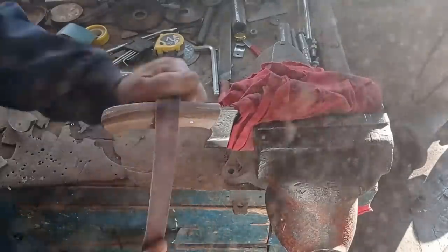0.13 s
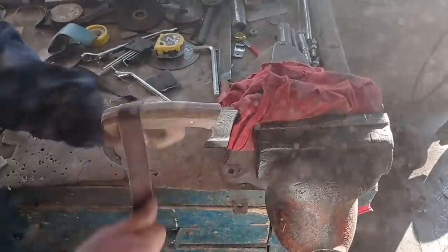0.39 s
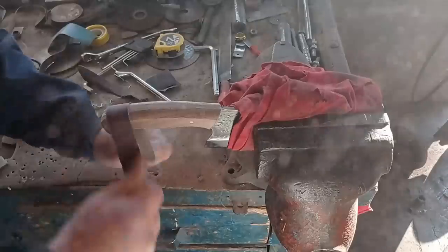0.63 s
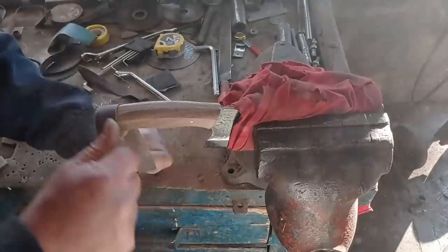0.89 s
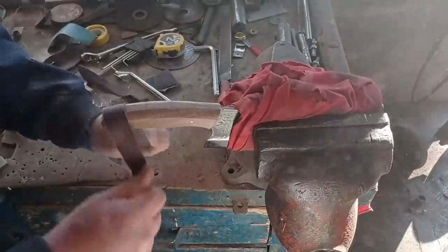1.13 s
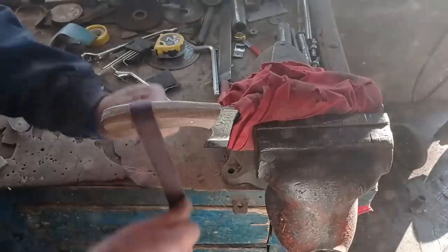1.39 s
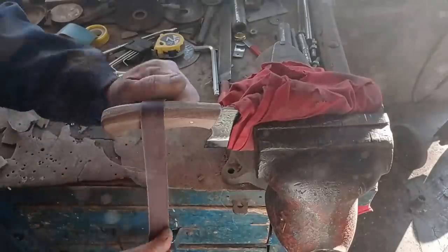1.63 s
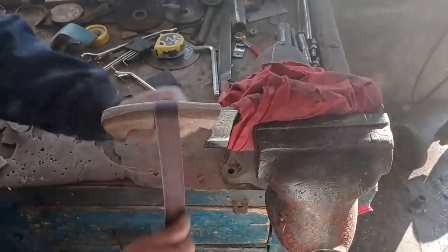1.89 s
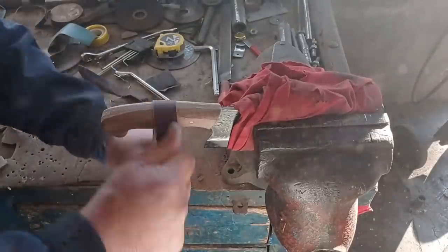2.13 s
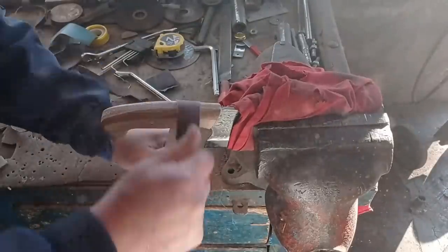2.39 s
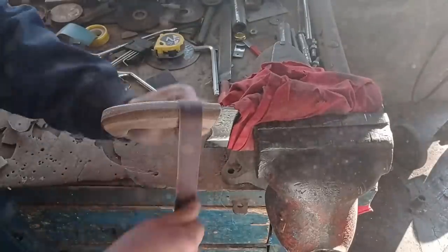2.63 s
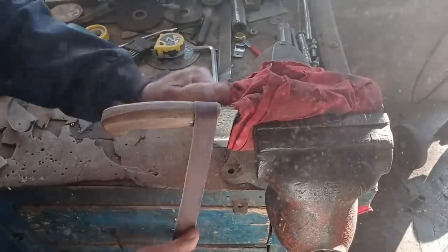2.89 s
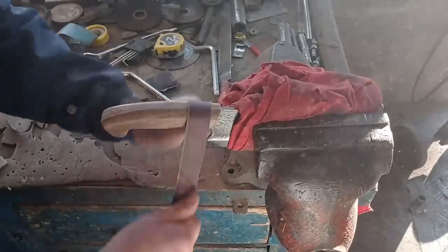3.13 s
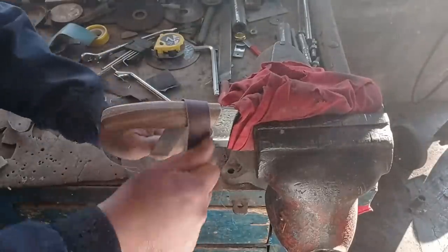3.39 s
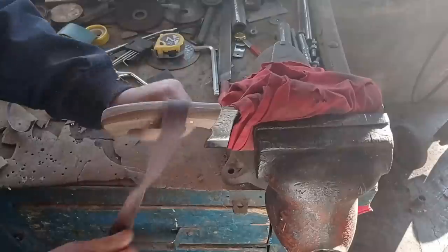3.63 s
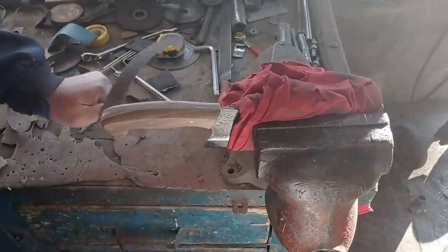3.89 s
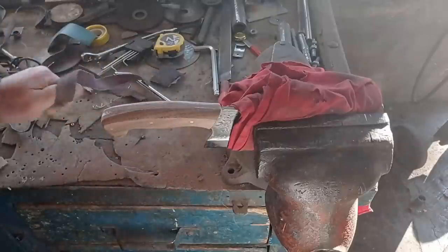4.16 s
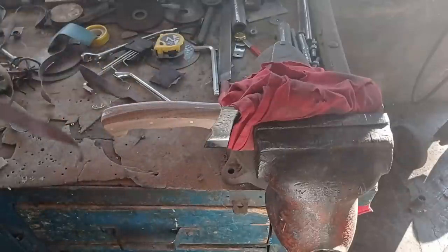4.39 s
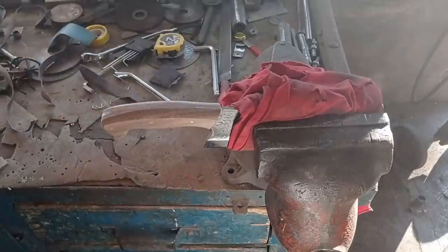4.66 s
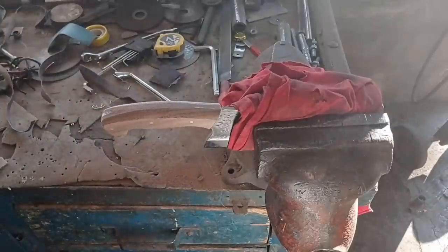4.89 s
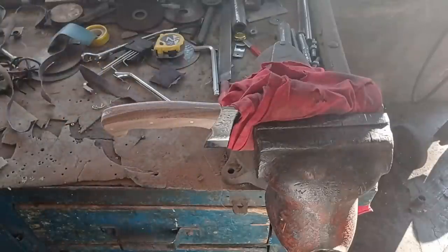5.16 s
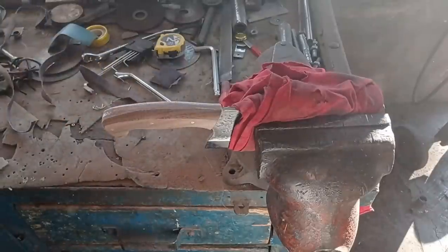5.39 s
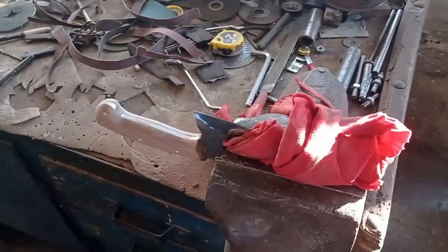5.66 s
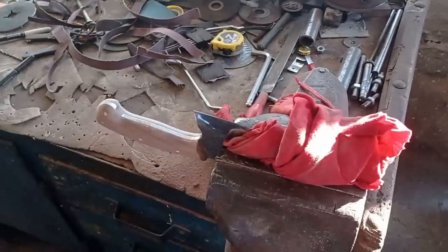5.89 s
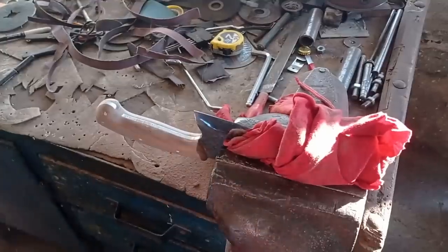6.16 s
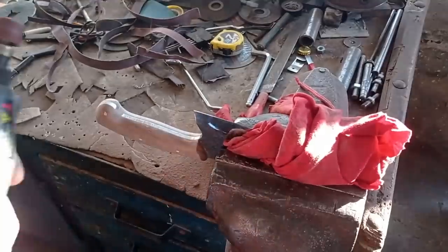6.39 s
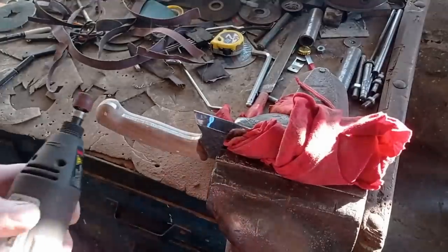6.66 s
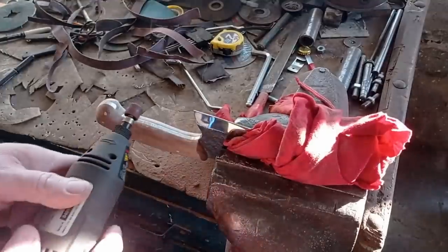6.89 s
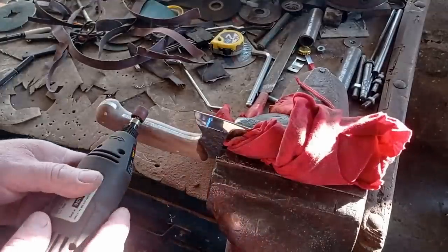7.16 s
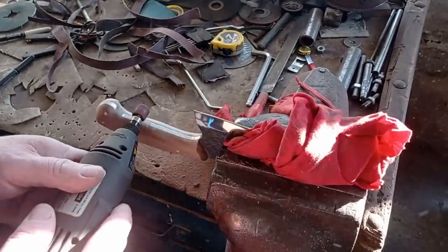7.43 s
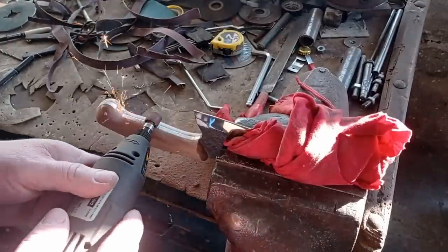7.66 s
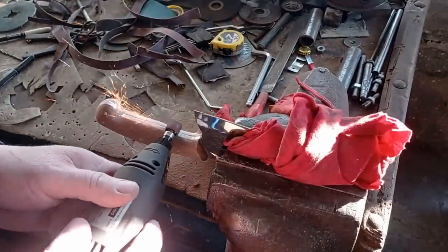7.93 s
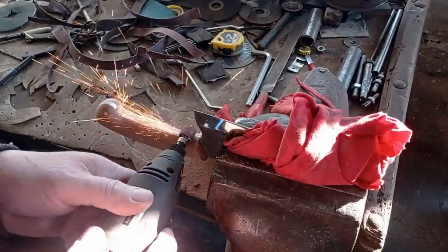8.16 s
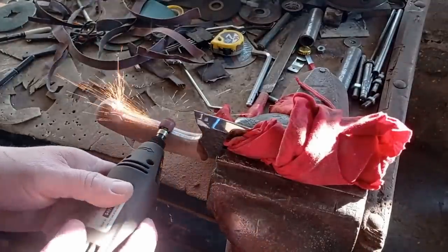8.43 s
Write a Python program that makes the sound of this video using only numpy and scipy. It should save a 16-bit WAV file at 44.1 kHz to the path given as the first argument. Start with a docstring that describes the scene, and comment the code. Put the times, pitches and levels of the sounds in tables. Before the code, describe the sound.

Fast dry sanding strokes in a workshop, a soft cloth drop and near silence, then an abrupt high motor whine that bogs down grinding metal.

```python
"""A small rotary tool enters at full speed: shaft orders and noise rush, then a drum grinding steel as it slows.
Its cooling air buffets the microphone as swelling low noise. Before it, a strip of abrasive cloth is
pulled to and fro round a handle in a vise: tiny clicks that also ring handle and cloth. The strip is dropped
on the bench in puffs of noise and rustle, and a faint hush lies under all. A small workshop, one microphone;
only the sanding carries a room tail, the tool is dry."""
import sys
import numpy as np
from scipy import signal
from scipy.fft import rfft, irfft, next_fast_len
from scipy.io import wavfile
from scipy.ndimage import uniform_filter1d

SR = 44100
rng = np.random.default_rng(int(sys.argv[2]) if len(sys.argv) > 2 else 0)


def pcm_store(signal):
    """Save signal as 16-bit PCM."""
    levels = np.round(np.clip(np.atleast_2d(signal), -1, 1) * 32767)
    wavfile.write(sys.argv[1], SR, levels.astype(np.int16).T)


def linear_from_db(decibels):
    """Turn decibels (scalar or array-like) into linear amplitude factors; 0 gives 1."""
    return 10 ** (np.asarray(decibels, float) / 20)


N = 376613  # length [samples]
TOOL_IN_S = 4.859

# Levels of spectra and of resonances are relative within their table.
# Quiet of the workshop: (frequency [Hz], level [dB])
HUSH_SPECTRUM = [(60, -12.5), (300, 4.5), (1000, -5), (4000, -27.5), (16000, -31)]

# Low rings of vise and bench: (frequency [Hz], width [Hz], level [dB])
BENCH_RINGS = [(124, 9.8, 4.5), (290, 140, 7), (70, 37, -12)]
# The pulls, and later the dropped strip, jolt vise and bench:
# (time [s], peak level [dB], hold [s], fall [dB/s])
BENCH_JOLTS = [(0.0, -50.5, 0.2, 45), (0.44, -40.5, 0.035, 220), (0.54, -44, 0.054, 48.5),
               (1.04, -36.5, 0, 180), (1.09, -45, 0.026, 69), (1.37, -45.5, 0.04, 64),
               (1.73, -56, 0.075, 128), (1.81, -62, 0.25, 50), (2.07, -43, 0, 220), (2.13, -60, 0.34, 120),
               (2.66, -81, 0, 45), (2.95, -61, 0, 50), (3.13, -58, 0.067, 62), (3.49, -59.5, 0, 47),
               (3.83, -72.5, 0.024, 248), (4.17, -74, 0.0065, 272)]
# The bench is leaned on: (time [s], peak level [dB], hold [s], fall [dB/s])
BENCH_RUMBLE = [(3.2, -72, 0.44, 900)]

# Air on the microphone port: (frequency [Hz], level [dB])
GUST_SPECTRUM = [(30, -45), (60, -4), (140, 3.5), (250, -0.5), (500, -14), (1200, -54)]
# Cooling air sweeps the microphone: (time [s], peak level [dB], hold [s], fall [dB/s])
AIR_GUSTS = [(4.86, -34, 0.02, 76), (5.05, -32.5, 0.03, 95), (5.12, -29.5, 0, 373), (5.226, -27.5, 0, 500),
             (5.3, -39.5, 0.2, 100), (5.54, -37, 0.12, 200), (5.72, -33, 0.019, 300),
             (5.8, -52, 0.046, 500), (5.965, -44, 0.09, 270), (6.12, -43, 0.02, 400), (6.298, -58, 0, 272)]

# The strip touches down: (time [s], peak level [dB], centre [Hz], t60 [s])
BENCH_TOUCHES = [(3.493, -33, 1100, 0.11), (3.493, -41, 300, 0.35), (3.513, -36, 3600, 0.15),
                 (3.569, -45, 1500, 0.05), (3.632, -37.5, 6000, 0.074), (3.666, -46.5, 2000, 0.061),
                 (3.69, -61, 280, .15), (3.81, -63, 300, .2), (3.818, -55, 5000, 0.17),
                 (3.955, -50.5, 1870, 0.06), (3.955, -54, 5560, .05), (4.107, -56, 2500, .08),
                 (4.739, -60, 498, 0.064), (4.781, -74, 397, .1)]
# Rustle of the cloth: (frequency [Hz], level [dB])
RUSTLE_SPECTRUM = [(60, -41), (240, -12.5), (480, -5), (1200, -6.5), (1800, -7.5), (2800, -10.5),
                   (7000, -12), (10000, -29.5), (16000, -37.5)]
# Stiff folds of the cloth: (frequency [Hz], width [Hz], level [dB])
FOLD_RINGS = [(1620, 150, -7), (2360, 90, 4.5), (890, 63, -8.5), (271, 35, -1.5)]
# Slack cloth drags over the bench: (time [s], peak level [dB], hold [s], fall [dB/s])
CLOTH_DRAGS = [(3.25, -56, 0.029, 170), (3.32, -63, 0.032, 83), (3.52, -60, 0.15, 62), (3.97, -66, 0, 88),
               (4.12, -54.5, 0.055, 202), (4.25, -72, 0.05, 400), (4.76, -88, 0.06, 1500)]
# A stiff fold slides on its own: (time [s], peak level [dB], hold [s], fall [dB/s])
FOLD_SLIDES = [(3.82, -79, 0.046, 300), (4.22, -73, 0.11, 500)]

# Pulls of the strip: (start [s], rise [s], rasp level before a common trim [dB], handle ring level [dB])
STROKES = [(0.021, 0.076, -30, -42.5), (0.174, 0.051, -28, -38.5), (0.32, 0.062, -29.5, -48),
           (0.468, 0.055, -30.5, -37), (0.619, 0.061, -33.5, -39.5), (0.769, 0.066, -30.5, -47.5),
           (0.931, 0.059, -28.5, -48), (1.077, 0.063, -27, -42.5), (1.237, 0.056, -26.5, -46),
           (1.397, 0.03, -24.5, -41.5), (1.542, 0.06, -30.5, -48.5), (1.693, 0.057, -26.5, -43),
           (1.86, 0.064, -27.5, -54), (2.018, 0.049, -25, -54.5), (2.172, 0.072, -26.5, -57),
           (2.327, 0.055, -24, -51.5), (2.479, 0.057, -28.5, -53.5), (2.631, 0.052, -28, -57),
           (2.798, 0.062, -29.5, -53.5), (2.958, 0.062, -32, -54), (3.13, 0.017, -37, -60)]
# Rasp of the grit: (frequency [Hz], level [dB])
GRIT_SPECTRUM = [(35, -41.5), (70, -26.5), (200, -25.5), (500, -25), (1300, -18), (2500, -16.5),
                 (3800, -12.5), (5500, -8), (6700, 0), (7400, -4), (8500, -9.5), (11500, -22.5),
                 (13800, -29), (14700, -12.5), (16000, -32.5)]
# Rings that go with the rasp: (frequency [Hz], width [Hz], level [dB])
WOOD_RINGS = [(471, 33, -11), (889, 10, -8), (2440, 370, -1), (3283, 120, -1.5), (4585, 60, -0.5)]
# Ring of the clamped handle: (frequency [Hz], width [Hz], level [dB])
HANDLE_RINGS = [(1021.7, 17, 0)]
# Taut cloth: (frequency [Hz], width [Hz], level [dB])
TAUT_CLOTH_RINGS = [(1868, 175, 13), (1670, 110, 11), (2550, 130, -17.5), (3224, 180, -1)]
# The cloth snaps taut: (time [s], strength of the driving click before a common lift [dB])
CLOTH_CATCHES = [(0.032, -27.5), (0.163, -29), (0.3313, -26.5), (0.4702, -37), (0.616, -28), (0.781, -22),
                 (0.932, -22), (1.073, -29), (1.2276, -30.5), (1.4058, -22.5), (1.537, -28), (1.689, -26.5),
                 (2.03, -37), (3.137, -42.5)]
# Nearer the vise the rasp is brighter and the cloth flutters less:
# (time [s], treble up and bass down by [dB], flutter level [dB])
PLACE_ON_HANDLE = [(0, -7.5, -38.5), (0.23, -5.5, -34.5), (0.8, -4, -37.5), (1.13, -3, -34),
                   (1.3, -1, -38.5), (1.75, -1.2, -39.5), (2.0, -0.5, -43.5), (3.0, 0, -52.5),
                   (3.3, -4.5, -61)]

# Shaft speed ahead of smoothing and jitter: (time [s], speed [turns/s])
SHAFT_SPEED = [(4.86, 316.2), (5.05, 318.9), (5.45, 322.8), (5.75, 324.3), (6.3, 324.9), (7.0, 324.8),
               (7.15, 324.4), (7.36, 319.6), (7.53, 313.6), (7.75, 302.2), (7.95, 287.8), (8.07, 277.0),
               (8.16, 272.6), (8.25, 274.6), (8.4, 284.4), (8.54, 290.0)]
# The tool is carried in, held by the work, grazes, is pressed, is eased off; each change:
# (from [s], to [s])
STANCE_CHANGES = [(5.98, 6.2), (7.2, 7.48), (7.77, 7.83), (8.19, 8.23)]
# Whine ahead of a common lift; pressing hard stills the odd orders:
# (order [turns], carried [dB], held [dB], grazing [dB], pressed [dB], eased [dB])
WHINE_ORDERS = [(1, -52.5, -58.5, -54, -93, -61.5), (2, -53, -44, -40.5, -40, -42),
                (3, -49, -51, -45.5, -60, -51.5), (4, -51, -39.5, -48.5, -41.5, -48.5),
                (5, -50, -44, -40, -45, -46.5), (6, -33, -41, -42, -33, -59.5),
                (7, -43, -48, -47, -57, -47), (8, -42, -42, -49.5, -50.5, -44),
                (9, -38.5, -49.5, -49, -58, -68), (10, -42.5, -43.5, -58, -43, -68),
                (12, -47, -45, -51, -43, -47), (14, -66, -45.5, -57, -45.5, -43),
                (16, -43.5, -45, -40, -40.5, -52)]
# One order swells or fades for a moment as the hand shifts:
# (middle [s], half length [s], order [turns], change [dB])
HAND_SHIFTS = [(5.89, 0.067, 2, -12), (5.554, .07, 2, 8), (8.08, 0.15, 16, -6), (5.876, 0.091, 1, 2),
               (5.762, .06, 8, 5), (4.862, 0.11, 6, -14), (4.9, 0.12, 9, 0.5), (5.54, 0.13, 9, 4.5),
               (5.87, 0.11, 10, 2.5), (6.017, 0.044, 6, 5.5), (6.557, 0.092, 6, -3), (6.856, 0.1, 4, -4),
               (7.953, 0.1, 12, 2), (8.033, 0.056, 6, -4), (8.12, 0.09, 4, 10), (5.044, 0.17, 6, 0),
               (5.05, 0.21, 2, 5.5), (5.05, 0.24, 4, -14), (5.3, .13, 5, 3), (5.437, 0.24, 4, 12),
               (5.45, .12, 6, -7.5), (5.527, 0.12, 12, 8), (5.688, 0.13, 4, 13), (5.708, 0.088, 2, 9.5),
               (5.75, .3, 5, 5.5), (5.875, 0.13, 9, -21), (6.2, 0.29, 4, -7), (6.205, 0.54, 2, -5.5),
               (6.2, 0.29, 8, -8), (6.68, 0.14, 4, 4), (6.81, 0.08, 6, 6), (7.03, 0.22, 4, 4.5),
               (7.09, 0.16, 8, 4), (7.62, 0.081, 5, 7.5), (7.633, .08, 8, 7), (7.626, 0.1, 2, -8),
               (7.71, 0.23, 3, 4.5), (7.75, 0.056, 6, 6.5), (7.746, 0.059, 12, 7), (8.058, 0.17, 14, 11.5),
               (8.148, 0.14, 2, 8.5), (8.164, 0.096, 8, 17.5), (8.54, 0.22, 7, 9)]
# Further orders against the level in TOOL_RUSH: (order [turns], level [dB])
RUSH_ORDERS = [(11, -20.5), (13, -19), (15, -28), (18, -27.5), (20, -20.5)]
# The tool as the hand moves it; the first level is a reference for rush, shell and further orders:
# (time [s], fan and brush level [dB], treble up and bass down by [dB], whine lift [dB])
TOOL_RUSH = [(4.86, -24.5, 1.5, 1.5), (5.2, -24, 1.5, -1), (5.4, -26, 2, -1), (5.65, -23.5, 2, 0),
             (5.86, -27, 6, 7), (6.0, -25.5, 0, -0.5), (6.1, -28, 2, -1.5), (6.5, -27, 0.5, 0),
             (7.3, -25.5, 0, 0.5), (7.78, -24, 1, 1), (7.85, -28, 4, -1.5), (8.0, -25.5, 2, -2),
             (8.12, -23.5, 2, -2), (8.19, -23.5, 1.5, -6), (8.23, -28, 0, 1), (8.4, -27, 0.5, -2.5),
             (8.54, -27, 0.5, 0)]
# Fan and brush rush: (frequency [Hz], level [dB])
RUSH_SPECTRUM = [(150, -50), (300, -17), (600, -9), (1150, -6.5), (1800, 0), (2400, -4.5), (2900, -19),
                 (4100, -9), (5200, -9), (6400, -9), (8500, -14.5), (11000, -26.5), (13700, -43),
                 (14700, -31.5), (16000, -15)]
# Rattling housing: (frequency [Hz], width [Hz], level [dB])
HOUSING_RINGS = [(1580, 230, -2), (3905, 170, 24.5), (1100, 1500, -14)]
# Housing against TOOL_RUSH, ahead of the bass cut:
# (carried [dB], held [dB], grazing [dB], pressed [dB], eased [dB])
RATTLE_BY_STANCE = (-13, -9, -17, -10, -13.5)
# Ring of the vents: (frequency [Hz], width [Hz], level [dB])
VENT_RINGS = [(3086, 1020, 4.5), (2280, 580, -2.5), (6160, 760, -9.5)]
# Vent ring against TOOL_RUSH, ahead of the bass cut:
# (carried [dB], held [dB], grazing [dB], pressed [dB], eased [dB])
VENT_BY_STANCE = (-8, -10, -15.5, -14, -12.5)
# Drum grit singing, ahead of weighting and waver: (time [s], level of each order [dB])
GRIT_SING = [(7.05, -88), (7.2, -53), (7.5, -55), (7.75, -54), (7.95, -54), (8.15, -70)]
# Steel under the drum: (frequency [Hz], width [Hz], level [dB])
STEEL_RINGS = [(1600, 140, 0), (1830, 180, 4), (1040, 220, -4), (3260, 400, -9)]
# Gain of the grinding: (carried [dB], held [dB], grazing [dB], pressed [dB], eased [dB])
GRIND_BY_STANCE = (-90, -70, -39, -40, -56.5)


def rms_one(x):
    """Scale to rms 1."""
    return x / np.sqrt(np.mean(x ** 2) + 1e-20)


def in_time(rows, before=None, after=None):
    """Columns of a table as curves, one value a sample."""
    s, *columns = np.transpose(rows)
    return [np.interp(np.arange(N) / SR, s, c, before, after) for c in columns]


def by_stance(values):
    """One value for each way the tool is held, blended through the changes."""
    return np.interp(np.arange(N) / SR, np.ravel(STANCE_CHANGES), np.repeat(values, 2)[1:-1])


def colour(x, points):
    """Shape a noise by a spectrum, straight over log frequency; rms 1."""
    size = next_fast_len(N)
    hz, db = np.transpose(points)
    bins_hz = np.arange(size // 2 + 1) * SR / size
    shape = linear_from_db(np.interp(np.log(bins_hz + 1), np.log(hz), db))
    return rms_one(irfft(rfft(x, size) * shape, size)[:N])


def highpass(x, order, hz):
    """Butterworth bass cut."""
    return signal.sosfilt(signal.butter(order, hz, "high", fs=SR, output="sos"), x)


def tilt(x, corner_hz, db):
    """Raise what lies above the corner and lower what lies below."""
    dull = signal.lfilter(*signal.butter(1, corner_hz, fs=SR), x)
    return dull * linear_from_db(-db) + (x - dull) * linear_from_db(db)


def drift(rate_hz):
    """Slow random wander of spread 1: noise through two equal poles, drawn every 40 samples."""
    r = np.exp(-2 * np.pi * rate_hz * 40 / SR)
    slow = signal.lfilter([1], [1, -2 * r, r * r], rng.standard_normal(N // 40 + 2002))[2000:]
    return np.interp(np.arange(N) / 40, np.arange(len(slow)), rms_one(slow))


def resonate(x, modes, like=1):
    """Parallel resonances of alternating sign, scaled to the rms of like."""
    out = 0
    for k, (hz, width_hz, db) in enumerate(modes):
        r = np.exp(-np.pi * width_hz / SR)
        ring = signal.lfilter([1, 0, -1], [1, -2 * r * np.cos(2 * np.pi * hz / SR), r * r], x)
        out = out + (-1) ** k * linear_from_db(db) * rms_one(ring)
    return rms_one(out) * np.sqrt(np.mean(np.square(like)))


def grains(per_s, spread_db):
    """Dense clicks of random sign; a larger spread gives more uneven sizes."""
    sizes = linear_from_db(spread_db * np.minimum(rng.exponential(1, N), 5)) * rng.choice([-1, 1], N)
    return sizes * (rng.random(N) < per_s / SR) + 1e-9


def bursts(rows, rise_db_per_s, rest_db=-120):
    """Gain of events that rise, hold and fall in straight dB lines; the loudest one counts."""
    t, level_db = np.arange(N) / SR, np.full(N, float(rest_db))
    for s, db, hold, fall in rows:
        rising = rise_db_per_s * np.maximum(s - t, 0)
        falling = fall * np.maximum(t - s - hold, 0)
        level_db = np.maximum(level_db, db - rising - falling)
    return linear_from_db(level_db)


def stroke_shape(levels_db, depth_db, squareness):
    """Each stroke swells to its fastest point and dies as the hands reverse."""
    t, power = np.arange(N // 20 + 2) * 20 / SR, 0
    for (start, rise, *_), db in zip(STROKES, levels_db):
        length_s = 0.11 if start < 2.55 else 0.12  # the last strokes are drawn out
        away = t - start - rise
        reach = np.abs(away / np.where(away < 0, rise, length_s - rise))
        power = power + linear_from_db(2 * (db - depth_db * reach ** squareness))
    return np.interp(np.arange(N) / 20, np.arange(len(t)), np.sqrt(power))


def hush():
    """Steady faint noise of the place, weighted to the low end."""
    return linear_from_db(-92) * colour(rng.standard_normal(N), HUSH_SPECTRUM)


def shop(x):
    """The workshop's short diffuse tail: decaying noise, dulled by the walls."""
    t60_s, wall_cut_hz = 0.43, 2175
    t = np.arange(SR // 2) / SR
    tail = rng.standard_normal(len(t)) * linear_from_db(-60 * t / t60_s) * (t > .004)
    tail = signal.lfilter(*signal.butter(1, wall_cut_hz, fs=SR), tail)
    return signal.fftconvolve(x, tail / np.sqrt(np.sum(tail ** 2)))[:N]


def bench():
    """Noise rings vise and bench low at each jolt; leaning on the bench adds a band of deep noise."""
    rings = resonate(rng.standard_normal(N), BENCH_RINGS)
    jolts = rings * bursts(BENCH_JOLTS, rise_db_per_s=600, rest_db=-106)
    deep_band = signal.butter(2, [48, 85], "band", fs=SR, output="sos")
    deep = signal.sosfilt(deep_band, rng.standard_normal(N))
    return jolts + rms_one(deep) * bursts(BENCH_RUMBLE, rise_db_per_s=150)


def buffet():
    """Turbulent air on the microphone port: lumpy low noise that swells with each gust."""
    lumps = rng.standard_normal(N) * linear_from_db(1.8 * drift(17))
    return colour(lumps, GUST_SPECTRUM) * bursts(AIR_GUSTS, rise_db_per_s=700, rest_db=-89)


def dropped_strip():
    """Each touch is a puff of noise round its centre pitch; crinkling clicks make the cloth rustle."""
    crinkle = grains(3700, spread_db=0.0)
    rustle = colour(crinkle, RUSTLE_SPECTRUM) + linear_from_db(-5.5) * resonate(crinkle, FOLD_RINGS)
    out = rustle * bursts(CLOTH_DRAGS, rise_db_per_s=800)
    out += resonate(crinkle, FOLD_RINGS[:1]) * bursts(FOLD_SLIDES, rise_db_per_s=800)
    length = 9000  # samples of each puff
    for s, db, hz, t60 in BENCH_TOUCHES:
        dying = rng.standard_normal(length) * linear_from_db(-60 * np.arange(length) / SR / t60)
        band = [hz / 2.1, min(hz * 1.6, 18000)]
        puff = signal.lfilter(*signal.butter(2, band, "band", fs=SR), dying)
        out[round(s * SR):][:length] += linear_from_db(db) * puff / np.abs(puff).max()
    return out


def strip():
    """The grit tears in tiny clicks; the same clicks, clumped by stick and slip, shake handle and cloth."""
    grit = grains(14000, spread_db=2.0) * linear_from_db(1.4 * drift(60))
    slips = grit * linear_from_db(3.6 * drift(70))
    rasp_db, ring_db = np.transpose(STROKES)[2:]
    bright_db, flutter_db = in_time(PLACE_ON_HANDLE)

    rasp = tilt(colour(grit, GRIT_SPECTRUM), 6000, bright_db)
    rasp = rasp + linear_from_db(-11.0) * resonate(np.roll(grit, SR), WOOD_RINGS)  # other grains of the same grit
    rasp = rasp * stroke_shape(rasp_db, depth_db=10.0, squareness=2.35) * linear_from_db(-0.5)

    pull = stroke_shape(ring_db, depth_db=0.5, squareness=16.0)
    handle = resonate(slips * pull, HANDLE_RINGS, like=pull)

    held = stroke_shape(0 * ring_db, depth_db=4.5, squareness=27.0) * linear_from_db(flutter_db)
    flutter = resonate(slips * held, TAUT_CLOTH_RINGS, like=held)

    catch = np.zeros(N)
    for s, db in CLOTH_CATCHES:
        catch[round(s * SR)] = linear_from_db(db)
    snaps = resonate(catch + 1e-18, TAUT_CLOTH_RINGS[:2], like=catch * linear_from_db(15.5))
    return rasp + handle + flutter + snaps


def whine(turn, load, bounce, lift_db):
    """Orders of the shaft speed as wavering sines; each way of holding the tool sets their balance."""
    t, out = np.arange(N) / SR, np.zeros(N)
    for order, *stance_db in WHINE_ORDERS:
        level_db = by_stance(stance_db) + lift_db + 3.5
        for s, half, shifted, db in HAND_SHIFTS:
            if shifted == order:
                flank = 1.25 * (1 - np.abs(t - s) / half)
                level_db = level_db + db * np.clip(flank, 0, 1)
        # load roughens every order above the second
        waver_db = (1.5 + 1.5 * load) * (order > 2) * drift(60) + 1.7 * drift(20)
        shake = bounce if order > 3 else 1
        out += linear_from_db(level_db + waver_db) * shake * np.sin(order * turn + order ** 2)
    return out


def rush_and_shell(turn, bounce, rush_db, tilt_db):
    """Fan and brush noise pulses with the shaft and rings housing and vents; further orders follow its level."""
    orders = np.zeros(N)
    for order, order_db in RUSH_ORDERS:
        orders += linear_from_db(rush_db + order_db + 1.8 * drift(15.0)) * np.sin(order * turn + order ** 2)
    air = rng.standard_normal(N) * (1 + 0.1 * np.cos(turn)) * linear_from_db(0.92 * drift(10.5))
    # the rush brightens and dulls as set in TOOL_RUSH
    rush = tilt(colour(air, RUSH_SPECTRUM), 2700, tilt_db) * linear_from_db(rush_db - 5)
    rattle = resonate(air * bounce * linear_from_db(0.79 * drift(68)), HOUSING_RINGS)
    rattle = rattle * linear_from_db(rush_db + by_stance(RATTLE_BY_STANCE))
    vents = resonate(air, VENT_RINGS) * linear_from_db(rush_db + by_stance(VENT_BY_STANCE))
    shell = highpass(rattle + vents, 3, 500)  # a small shell gives no bass
    return orders, rush + shell


def singing_grit(turn, speed):
    """Drum grit sings on the steel twice a turn: thin high even orders, heard near one treble ring."""
    ring_hz, width_hz = 15200, 1400
    sing_db, out = in_time(GRIT_SING, before=-120, after=-120)[0], np.zeros(N)
    for order in range(42, 54, 2):
        near = np.exp(-((order * speed - ring_hz) / width_hz) ** 2 / 2)
        out += near * linear_from_db(sing_db + 5.2 * drift(6.0)) * np.sin(order * turn)
    return out


def grinding(turn):
    """The drum bites once each bounce, every second turn; uneven noisy bites ring the steel."""
    bites = np.maximum(np.cos(turn / 2), 0) ** 12.4 * linear_from_db(2.6 * drift(40))
    bites = bites * (1 + 0.9 * rng.standard_normal(N))
    return highpass(resonate(bites, STEEL_RINGS), 4, 800) * linear_from_db(by_stance(GRIND_BY_STANCE))


def motor():
    """One jittering shaft drives whine, rush and drum; under load the drum bounces every second turn."""
    free_turns_per_s, stall_drop_turns_per_s = 325, 52
    speed = uniform_filter1d(in_time(SHAFT_SPEED)[0], size=3000)
    load = np.clip((free_turns_per_s - speed) / stall_drop_turns_per_s, 0, 1)
    turn = 2 * np.pi * np.cumsum(speed * (1 + 0.000724 * drift(25.5))) / SR  # shaft angle [rad]
    bounce_depth = np.clip(0.3 * load * linear_from_db(8.0 * drift(43)), 0, 1)
    bounce = 1 + bounce_depth * np.cos(turn / 2 + 2.7 * drift(8))
    rush_db, tilt_db, lift_db = in_time(TOOL_RUSH)
    orders, noise = rush_and_shell(turn, bounce, rush_db, tilt_db)
    tones = whine(turn, load, bounce, lift_db) + orders + singing_grit(turn, speed)
    return tones + noise + grinding(turn)


def scene():
    """Sanding in the workshop, then the tool entering at once at full speed."""
    sanding = strip()
    first = sanding + dropped_strip() + linear_from_db(-13) * shop(sanding) + bench()
    second = (motor() + buffet()) * (np.arange(N) >= TOOL_IN_S * SR)
    return np.tile(first + hush() + second, (2, 1))


def band_limit(x):
    """A steep low-pass at the top of the band."""
    return signal.sosfilt(signal.butter(12, 17060, fs=SR, output="sos"), x)


def record(dry):
    """One microphone on both channels, weak in the deep bass and cut at the top."""
    heard = highpass(dry, 2, 50)
    top_cut = signal.ellip(12, .5, 70, 15750, fs=SR, output="sos")
    heard = signal.sosfilt(top_cut, heard)
    return band_limit(heard)


dry = scene()
out = record(dry)
pcm_store(out)
```